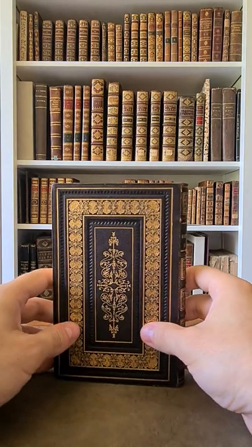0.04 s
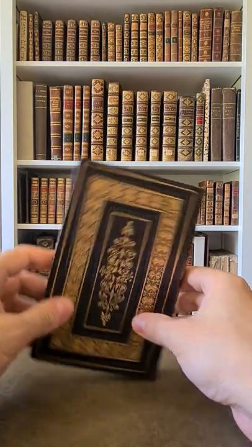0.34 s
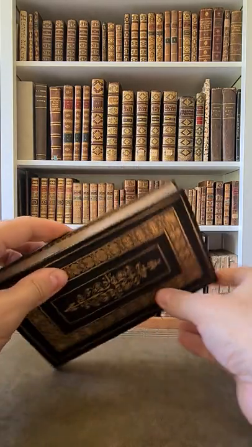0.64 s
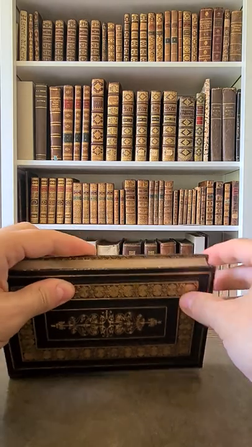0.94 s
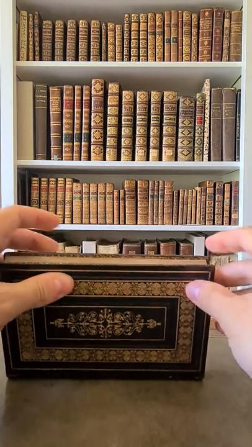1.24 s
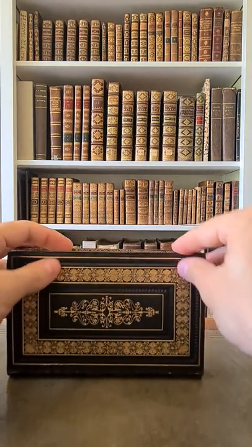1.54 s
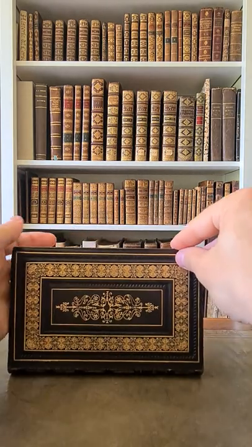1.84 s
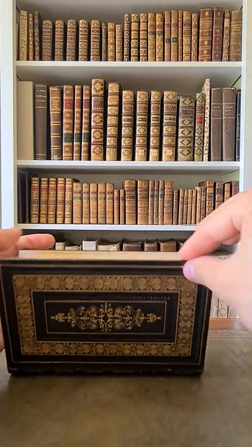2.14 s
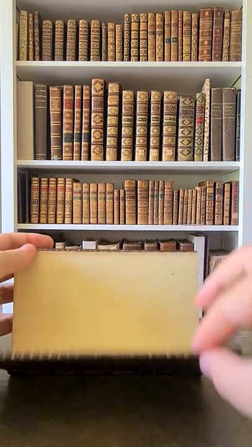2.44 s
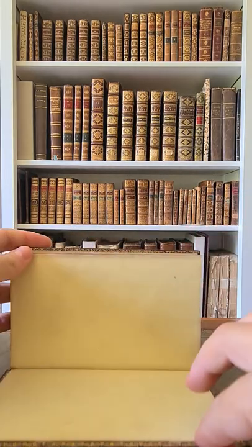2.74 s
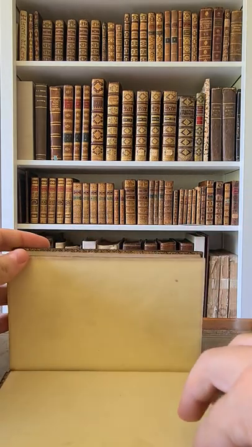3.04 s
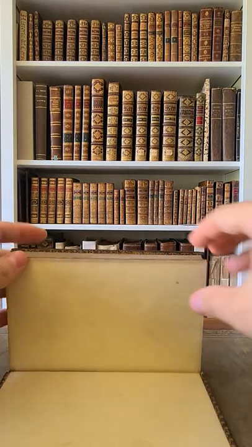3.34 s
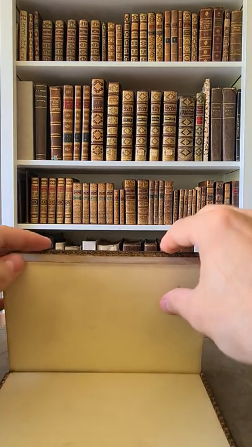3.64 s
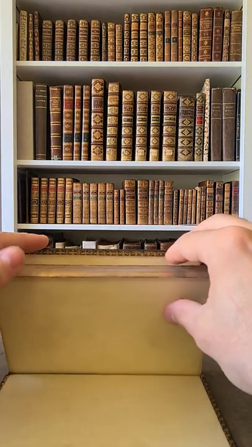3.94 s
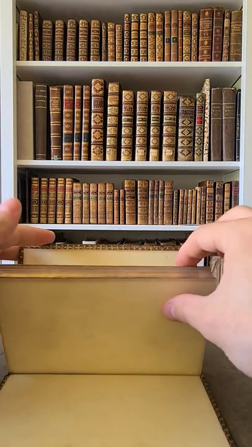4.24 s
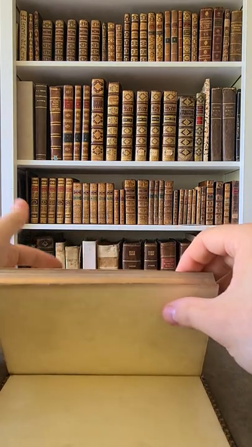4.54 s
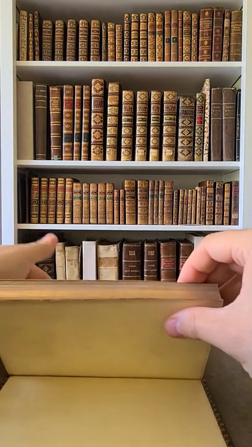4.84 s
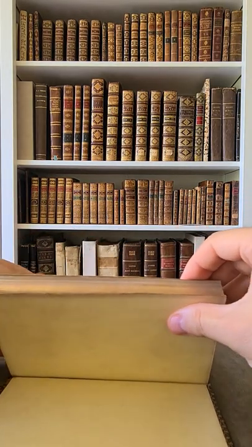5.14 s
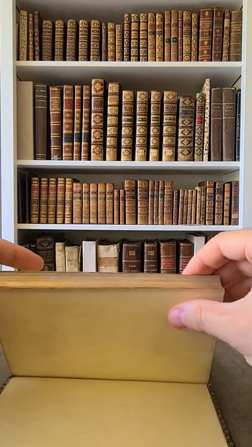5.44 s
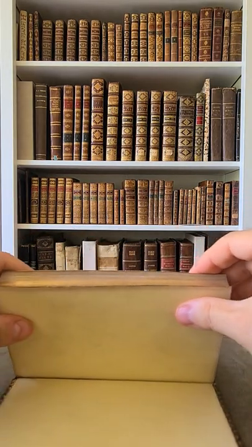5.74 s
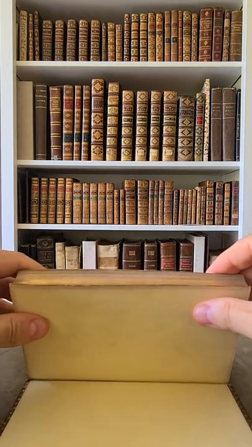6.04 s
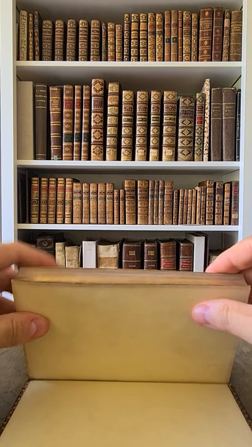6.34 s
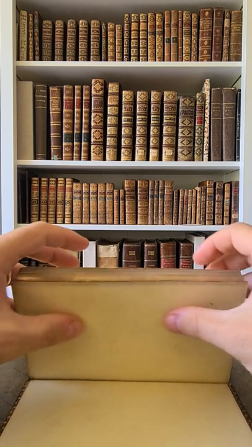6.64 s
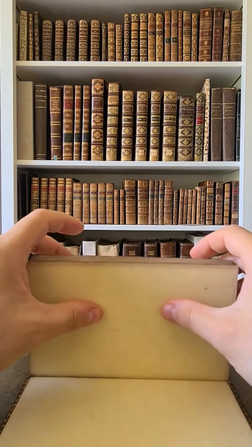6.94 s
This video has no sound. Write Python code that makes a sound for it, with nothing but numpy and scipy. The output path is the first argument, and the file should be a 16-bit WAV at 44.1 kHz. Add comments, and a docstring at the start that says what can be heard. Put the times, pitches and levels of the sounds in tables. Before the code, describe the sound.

An old leather-bound book is turned on a table, with faint scrapes, finger rustles, dry ticks and a few soft rocking thuds. The cover drops open with a clap. A couple of seconds later something hard knocks loudly and bounces, its hollow ring filling the room. Light ticks and finger slides follow. The book sounds close in a quiet, echoing room, while a faint low hum comes and goes.

```python
"""An old leather-bound book is turned on a table and opened in a quiet, live room.
Its edges drag in tiny slips and land with rocking thuds, the cover drops open with a clap,
and fingers rustle, hiss and tick on leather and paper. Something hard knocks once and bounces,
its hollow ring filling the room. A low hum, perhaps an engine outdoors, comes and goes,
and a deep rumble creeps in at the end."""
import sys
import numpy as np
from scipy import signal
from scipy.fft import rfft, irfft, next_fast_len
from scipy.io import wavfile

SR = 44100
rng = np.random.default_rng(int(sys.argv[2]) if len(sys.argv) > 2 else 0)


def materialize(psi):
    """Save the field psi as 16-bit PCM at rate SR to the path in sys.argv[1].

    A 1-D psi becomes a single channel; in a 2-D psi each row is a channel.
    """
    bounded = np.clip(np.atleast_2d(psi).T, -1, 1)
    quanta = np.round(bounded * 32767).astype(np.int16)
    wavfile.write(sys.argv[1], SR, quanta)


N = 308259
TIME = np.arange(N) / SR

# room tone: (frequency [Hz], level [dB])
AIR_COLOUR = [(24, -26.5), (43, -0.5), (60, -2), (85, -14.5), (120, -7.5), (175, -19), (260, -13.5),
              (480, -26), (720, -23), (900, -28.5), (1300, -23), (2100, -34), (3200, -33.5), (4500, -42),
              (6400, -40), (7200, -62), (10000, -58.5), (12500, -50)]
# stereo image of room tone and rustle: (frequency [Hz], left-right likeness [-1..1])
DIFFUSE_LIKENESS = [(50, 0.93), (250, 1), (600, 0.26), (1500, 0.068), (5000, 0.071)]
# the boards shift in the hands: (start [s], end [s], level [dB], fade [dB/s])
GRIP_MOVES = [(0.13, 1.647, -64.5, 8), (4.85, 5.014, -70.5, 26), (5.75, 5.81, -70.5, 27.5),
              (6.801, 6.91, -72, 34)]
# their dull rustle: (frequency [Hz], level [dB])
RUSTLE_COLOUR = [(60, -7.5), (150, -6), (240, 1.5), (350, -5.5), (500, -6.5), (700, -14.5), (1150, -14),
                 (1900, -17.5), (3100, -21.5), (6200, -24.5), (7400, -51)]
# an edge drags over the table: (peak time [s], level [dB], length [s], brightness [dB/octave])
EDGE_DRAGS = [(0.134, -66, 0.1, 3.5), (0.372, -59, 0.17, -3), (0.485, -57.5, 0.11, 1),
              (0.618, -61, 0.18, 0.5), (0.725, -66, 0.077, 4), (0.916, -61, 0.24, 1.5),
              (1.566, -62, 0.21, 2.5)]
# resonances of the dragged board: (frequency [Hz], width [Hz], level [dB])
BOARD_MODES = [(404, 71, 1), (548, 300, -5.5), (1095, 290, -9.5), (2900, 780, -19)]
# book meets table: (time [s], level [dB], hardness [Hz], low cut [Hz], rebound gap [s], rebound loss [dB])
TABLE_BUMPS = [(0.2851, -24.5, 400, 149, .0118, 2.5), (0.741, -32, 140, 80, 0.0305, 7),
               (0.835, -34.5, 225, 90.5, 0.028, 19), (1.0698, -20.5, 163, 113, .035, 8),
               (1.477, -36.5, 220, 70, .03, 10), (1.562, -40, 420, 250, 0.021, 4),
               (1.767, -38.5, 304, 190, 0.024, 13), (3.0833, -25, 1160, 56, .0138, 5),
               (6.423, -45, 1500, 500, 0.026, 16.5)]
# modes of the book on the table: (frequency [Hz], level [dB], t60 [s], first swing [+/-1])
BOOK_MODES = [(74.6, -14, 0.086, 1), (122, -11.5, 0.083, 1), (199, -15, 0.038, 1), (268, -9, 0.023, 1),
              (377, -11, 0.039, 1), (540, -9.5, 0.028, 1), (713, -7.5, 0.032, 1), (1127, -8.5, 0.02, 1),
              (1375, -13.5, 0.02, 1), (2140, -12.5, 0.021, 1)]
# reverb decay: (frequency [Hz], t60 [s])
REVERB_T60 = [(70, 0.7), (200, 0.66), (500, 1.2), (1100, 1.68), (2000, 1.3), (3000, 0.6), (6000, 0.55),
              (14000, .25)]
# reverb tone: (frequency [Hz], level [dB])
REVERB_COLOUR = [(70, -5.5), (140, 2), (210, 7), (320, 2), (500, -.5), (700, -8.5), (1000, -3.5), (1250, 1),
                 (1600, -6.5), (2100, -0.5), (5000, -5), (14000, -7)]
# reverb image: (frequency [Hz], left-right likeness [-1..1])
REVERB_LIKENESS = [(100, 0.8), (300, 1), (600, 0.79), (1100, -0.46), (2500, 0.33)]
# skin slides on the binding: (peak time [s], hiss [dB], rasp [dB], rasp pitch [Hz], length [s])
FINGER_SLIDES = [(0.386, -66.5, -63, 3950, 0.13), (0.518, -76, -80, 3000, 0.28),
                 (0.734, -58.5, -77, 5000, 0.21), (0.853, -68.5, -77, 3300, 0.24),
                 (1.453, -74.5, -75, 3500, 0.23), (1.57, -72, -73, 3200, 0.14),
                 (4.84, -86.5, -78, 5000, 0.55), (5.87, -80.5, -91.5, 4500, .3),
                 (6.523, -69.5, -71.5, 5330, 0.21), (6.697, -64, -67.5, 5030, 0.12)]
# hiss of skin on leather: (frequency [Hz], level [dB])
HISS_COLOUR = [(800, -11.5), (2000, -4.5), (3300, -5), (5500, -2.5), (7500, -14.5), (10000, -17.5),
               (14000, -8), (16000, -10)]
# ticks of dry leather and paper: (time [s], level [dB], centre [Hz])
DRY_TICKS = [(0.739, -40, 4520), (0.8343, -39, 3200), (1.526, -48, 4270), (1.532, -44, 3000),
             (1.563, -43, 3000), (1.588, -46, 3200), (3.0836, -44, 3180), (5.731, -54, 4009),
             (5.832, -57, 4466), (6.4235, -47, 2800), (6.5316, -35.5, 5350)]
# swells of the hum: (start [s], end [s], pitch [Hz], level [dB], sub-octave level [dB], fade [dB/s])
HUM_SWELLS = [(1.1, 2.35, 110.9, -58.5, -69.5, 12), (4.716, 5.017, 124.1, -59.5, -72.5, 90.5),
              (5.979, 6.358, 118.2, -51.5, -58.5, 25)]
# the knock and its bounces: (time [s], level [dB], hardness [Hz])
KNOCK_CONTACTS = [(5.1578, -5.5, 2900), (5.1606, -16, 3140), (5.2, -15.5, 1960), (5.2026, -24, 2200)]
# modes of the knocked object: (frequency [Hz], level [dB], t60 [s], first swing [+/-1])
KNOCK_MODES = [(86, -24, 0.044, -1), (171, -23.5, 0.042, -1), (219.7, -28, 0.12, -1),
               (266.4, -27.5, 0.075, -1), (456, -28.5, 0.08, -1), (530, -17.5, 0.036, -1),
               (812, -16, 0.029, -1), (940, -20, .03, -1), (1064, 1.5, 0.01, -1), (1185, -0.5, 0.015, 1),
               (1362, -13, 0.014, 1), (1650, -26.5, 0.019, 1), (1943, -19, .026, -1),
               (2464, -31.5, .041, -1), (2755, -34.5, 0.046, -1)]
# woody crack of each contact: (frequency [Hz], level [dB])
CRACK_COLOUR = [(60, -13.5), (170, 2.5), (330, -5.5), (650, -2.5), (1500, -2), (2800, -0.5), (3300, -12),
                (3900, -22), (4800, -23), (6200, -33.5), (9000, -41.5), (13000, -32.5)]
# reflections off nearby surfaces: (delay [s], left [dB], right [dB])
EARLY_ECHOES = [(.0055, -22.5, -28.5), (0.0137, -13, -23), (0.0195, -30, -9.5), (.0305, -26.5, -15.5)]


def from_db(db):
    """Decibels to gain."""
    return 10 ** (np.asarray(db) / 20)


def rms_one(x):
    """Scale to unit power."""
    return x / np.sqrt(np.mean(x ** 2) + 1e-20)


def at_hz(points, hz):
    """Read a table on a log-frequency axis."""
    f, value = np.transpose(points)
    return np.interp(np.log(np.maximum(hz, 1)), np.log(f), value)


def cut(x, hz, kind, order=2):
    """Butterworth filter."""
    return signal.sosfilt(signal.butter(order, hz, kind, fs=SR, output="sos"), x)


def pan(right_db):
    """Stereo gains for a source that leans to the right."""
    return from_db(np.array([[-.5], [.5]]) * right_db)


def add(track, s, sound):
    """Mix a short sound in at time s."""
    at = round(s * SR)
    track[..., at:at + sound.shape[-1]] += sound[..., :N - at]


def drift(rate_hz):
    """Random modulator that glides between values of spread 1."""
    knots = rng.standard_normal(2048)
    return np.interp(TIME * rate_hz, np.arange(len(knots)), knots)


def noise(colour, likeness, size=N):
    """Stereo noise with a given spectrum and left-right likeness; rms 1."""
    padded = next_fast_len(size, True)
    hz = np.fft.rfftfreq(padded, 1 / SR)
    mid, side = rfft(rng.standard_normal((2, padded)))
    alike = at_hz(likeness, hz)
    pair = np.sqrt(1 + alike) * mid + np.sqrt(1 - alike) * side * [[1], [-1]]
    return rms_one(irfft(pair * from_db(at_hz(colour, hz)), padded)[:, :size])


def resonate(x, hz, width_hz):
    """A resonance applied twice, for steep sides; rms 1."""
    b, a = signal.iirpeak(hz, hz / width_hz, fs=SR)
    return rms_one(signal.lfilter(b, a, signal.lfilter(b, a, x)))


def held_db(start, end, rise_db_per_s, fall_db_per_s):
    """Attack, hold at 0 dB from start to end, release."""
    return -rise_db_per_s * np.maximum(start - TIME, 0) - fall_db_per_s * np.maximum(TIME - end, 0)


def stroke(s, length, rise_share=.54, depth_db=19.5):
    """Gain of a rub that speeds up to its peak at time s and slows again; its ends are depth_db down."""
    away = np.maximum((s - TIME) / rise_share, (TIME - s) / (1 - rise_share)) / length
    return from_db(-depth_db * np.minimum(away, 10))


def strike(modes, scatter_db=1.0):
    """One blow: every mode rings down from a slightly random strength."""
    t = TIME[:SR // 5]
    hz, level_db, t60, swing = np.transpose(modes)[:, :, None]
    strength_db = level_db + scatter_db * rng.standard_normal(hz.shape)
    return np.sum(swing * from_db(strength_db - 60 * t / t60) * np.sin(2 * np.pi * hz * t), axis=0)


def room_tone(level_db=-61.5):
    """Still air lays a faint, dark bed under everything."""
    return from_db(level_db) * noise(AIR_COLOUR, DIFFUSE_LIKENESS) * pan(right_db=2.5)


def board_rustle(rise_db_per_s=37, lurch_db=2.5):
    """The boards rustle unevenly while the hands move them, then settle."""
    effort = sum(from_db(level_db + held_db(start, end, rise_db_per_s, fade))
                 for start, end, level_db, fade in GRIP_MOVES)
    rustle = noise(RUSTLE_COLOUR, DIFFUSE_LIKENESS)
    return rustle * effort * from_db(lurch_db * drift(45)) * pan(right_db=3.5)


def edge_drags(slips_per_s=1500):
    """Tiny uneven slips of the edge ring the board's resonances; a sharper edge favours the upper ones."""
    slips = (rng.random(N) < slips_per_s / SR) * rng.standard_normal(N) + 1e-18
    strokes = np.array([stroke(s, length) for s, _, length, _ in EDGE_DRAGS])
    _, level_db, _, tilt_db = np.transpose(EDGE_DRAGS)
    out = 0
    for hz, width_hz, mode_db in BOARD_MODES:
        octaves = np.log2(hz / BOARD_MODES[0][0])
        envelope = from_db(level_db + mode_db + tilt_db * octaves) @ strokes
        out = out + envelope * resonate(slips, hz, width_hz)
    return out * pan(right_db=3.5)


def book_bumps(contacts=3, hardness_kept=.66):
    """Soft leather edges thud, the flat cover claps; each rocks on in weaker, duller rebounds."""
    out = np.zeros(N)
    for s, level_db, hard_hz, low_cut_hz, gap, loss_db in TABLE_BUMPS:
        for k in range(contacts):
            blow = cut(strike(BOOK_MODES), hard_hz * hardness_kept ** k, "low")
            add(out, s + k * gap, from_db(level_db - k * loss_db) * cut(blow, low_cut_hz, "high"))
    return out * pan(right_db=6.0)


def room_reverb(send, build_s=0.0095, size=2 ** 16):
    """A diffuse tail blooms after each blow and dies band by band, slowest in the mids."""
    t, hz = TIME[:size], np.fft.rfftfreq(size, 1 / SR)
    spectrum = rfft(noise(REVERB_COLOUR, REVERB_LIKENESS, size))
    centres, t60s = np.transpose(REVERB_T60)
    tail = 0
    for t60, share in zip(t60s, np.eye(len(centres))):
        band = irfft(spectrum * at_hz(np.c_[centres, share], hz), size)
        tail = tail + band * from_db(-60 * t / t60)
    bloom = 1 - np.exp(-(t / build_s) ** 2)
    return signal.fftconvolve(send, tail * bloom / np.sqrt(SR), axes=1)[:, :N] * pan(right_db=3.5)


def finger_slides(grain_db=2.0, rasp_width_hz=1000):
    """Skin catches and slips on leather: a grainy hiss with a narrower rasp in it."""
    hiss = noise(HISS_COLOUR, likeness=[(1000, 0.25), (8000, .2)])
    friction = rng.standard_normal((2, N))
    out = 0
    for s, hiss_db, rasp_db, rasp_hz, length in FINGER_SLIDES:
        rasp = resonate(friction, rasp_hz, rasp_width_hz)
        out = out + stroke(s, length) * (from_db(hiss_db) * hiss + from_db(rasp_db) * rasp)
    return out * from_db(grain_db * drift(250)) * pan(right_db=5.0)


def dry_ticks(band_ratio=1.41, edge_db=-20, snap_t60=0.0067):
    """Leather and paper snap: an octave-wide body of noise under a thin bright edge."""
    out, t = np.zeros((2, N)), TIME[:SR // 10]
    for s, level_db, centre_hz in DRY_TICKS:
        snap = rng.standard_normal((2, len(t))) * from_db(-60 * t / snap_t60)
        body = cut(snap, [centre_hz / band_ratio, centre_hz * band_ratio], "band")
        edge = from_db(edge_db) * cut(snap, centre_hz, "high")
        add(out, s, from_db(level_db) * (body + edge))
    return out * pan(right_db=6.0)


def distant_hum(waver_db=1.63, wander_hz=0.56, overtone_db=-24, right_lag_s=0.00021):
    """A far drone swells and fades: one tone, a lingering octave below and a weak octave above."""
    attack_ratio, sub_linger_s = 1.7, 0.33   # a swell rises this many times faster than it fades
    bend_hz_per_db = 0.23   # the pitch climbs as the hum weakens
    out, wander = 0, wander_hz * drift(2.5)
    for start, end, hz, level_db, sub_db, fade in HUM_SWELLS:
        swell_db = held_db(start, end, attack_ratio * fade, fade)
        sub_swell_db = held_db(start, end + sub_linger_s, attack_ratio * fade, fade)
        pitch_hz = hz - bend_hz_per_db * swell_db + wander
        phase = 2 * np.pi * (np.cumsum(pitch_hz) / SR - pitch_hz * right_lag_s * [[0], [1]])
        tone = from_db(level_db + swell_db) * (np.sin(phase) + from_db(overtone_db) * np.sin(2 * phase))
        sub = from_db(sub_db + sub_swell_db) * np.sin(phase / 2)
        out = out + tone + sub
    return np.sqrt(2) * out * from_db(-waver_db * drift(5.6)) * pan(right_db=0.6)


def hard_knock(crack_db=-22, crack_t60=0.027, closing_s=0.0038, left_lag_s=.00008):
    """Two strong, close modes lead a hollow, damped ring; each contact adds a broad, woody crack."""
    out, t = np.zeros((2, N)), TIME[:SR // 10]
    attack = np.sin(np.pi / 2 * np.minimum(t / closing_s, 1)) ** 2   # the contact takes a moment to close
    decay = from_db(-60 * t / crack_t60)
    for s, level_db, hard_hz in KNOCK_CONTACTS:
        blow = cut(strike(KNOCK_MODES), hard_hz, "low", order=4)
        ring = from_db(level_db) * cut(blow, 60, "high", order=4)
        add(out[0], s + left_lag_s, ring)
        add(out[1], s, ring)
        crack = noise(CRACK_COLOUR, likeness=[(100, .9), (5000, .5)], size=len(t))
        add(out, s, from_db(level_db + crack_db) * crack * attack * decay)
    return out * pan(right_db=5.5)


def early_echoes(x):
    """Nearby surfaces throw back single reflections, each stronger on one side."""
    out = np.zeros((2, N))
    for delay, left_db, right_db in EARLY_ECHOES:
        add(out, delay, from_db([[left_db], [right_db]]) * x.mean(axis=0))
    return out


def deep_rumble(level_db=-54.5, full_at_s=6.72, rise_db_per_s=22, low_hz=42, high_hz=60):
    """A narrow band of sub-bass noise fades up, dead centre, and holds to the end."""
    swell_db = -rise_db_per_s * np.maximum(full_at_s - TIME, 0)
    return from_db(level_db + swell_db) * rms_one(cut(rng.standard_normal(N), [low_hz, high_hz], "band"))


def scene():
    """The book is close and fairly dry; the knock fills the room."""
    book = book_bumps() + dry_ticks()
    knock = hard_knock()
    send = (from_db(-3.0) * book + from_db(1.0) * knock).mean(axis=0, keepdims=True)
    room = early_echoes(knock) + room_reverb(send) + room_tone()
    handling = edge_drags() + finger_slides() + board_rustle()
    return book + knock + room + handling + distant_hum() + deep_rumble()


def record(dry, low_cut_hz=30, high_cut_hz=15900):
    """Master EQ: roll off the deepest bass and cut the very top steeply."""
    high_cut = signal.ellip(10, .1, 80, high_cut_hz, fs=SR, output="sos")
    return signal.sosfilt(high_cut, cut(dry, low_cut_hz, "high", order=6))


dry = scene()
out = record(dry)
materialize(out)
```